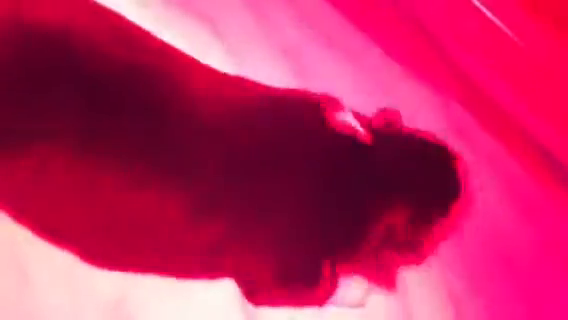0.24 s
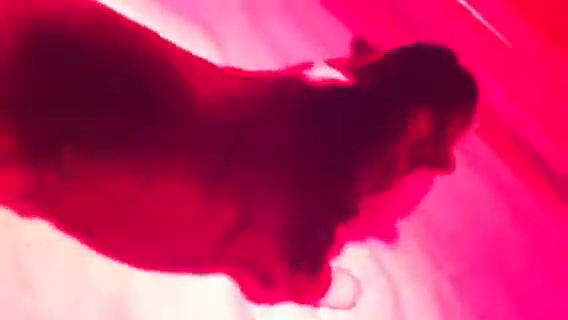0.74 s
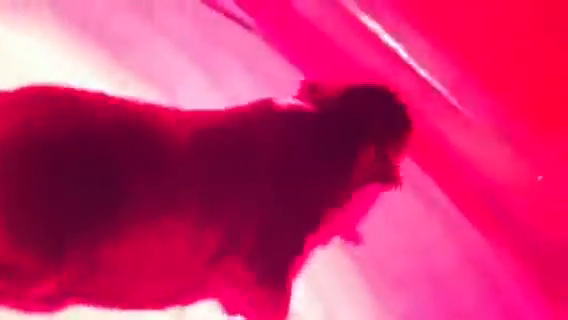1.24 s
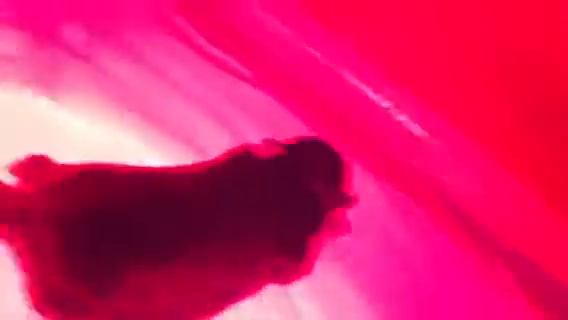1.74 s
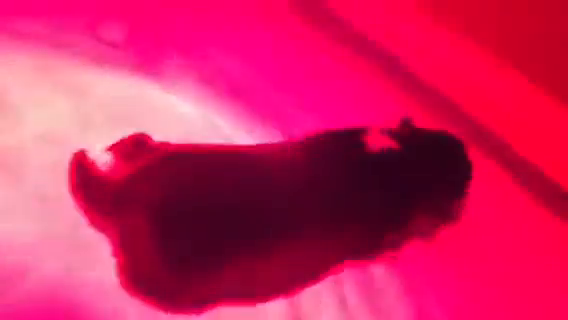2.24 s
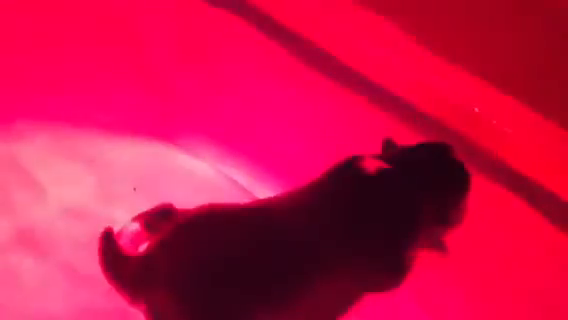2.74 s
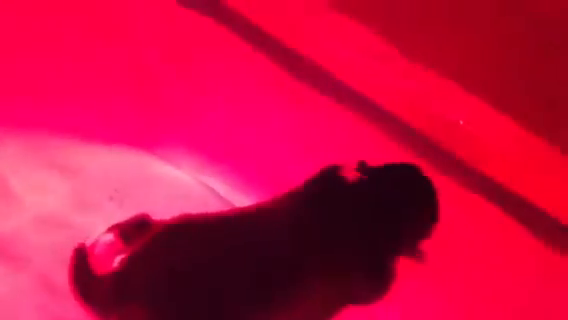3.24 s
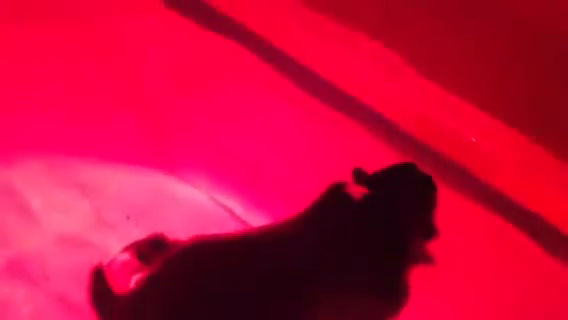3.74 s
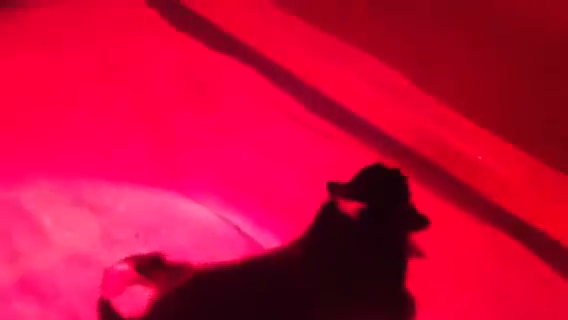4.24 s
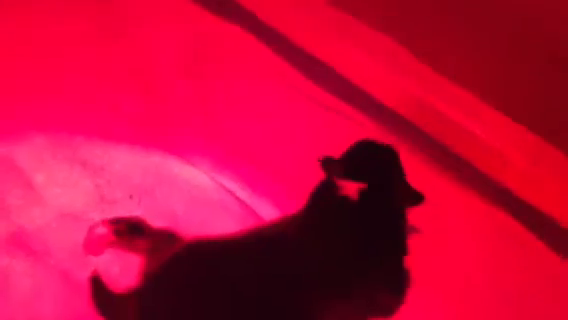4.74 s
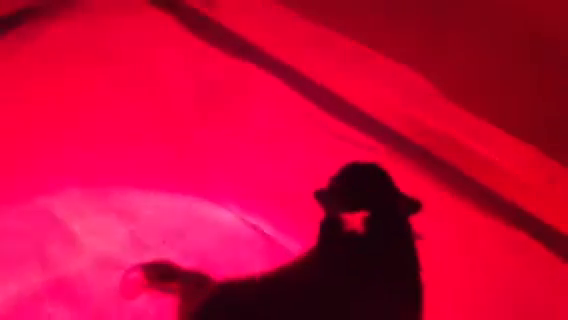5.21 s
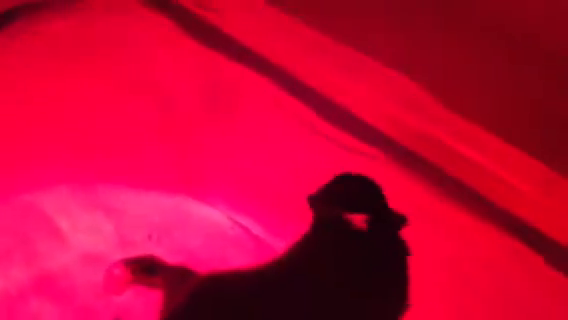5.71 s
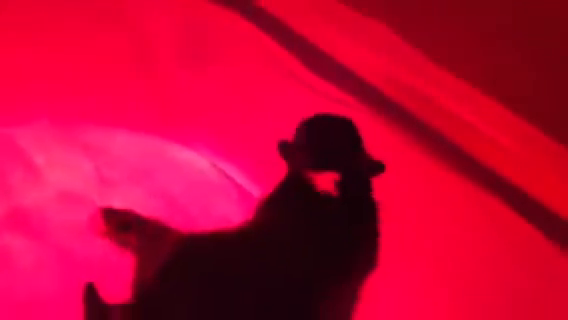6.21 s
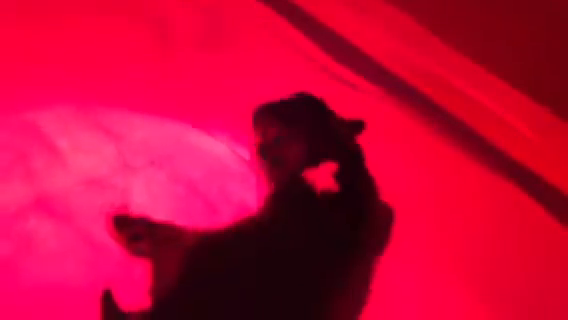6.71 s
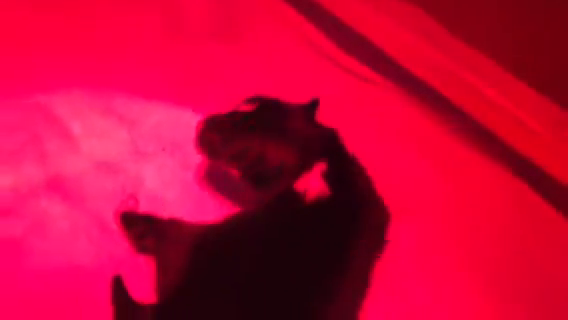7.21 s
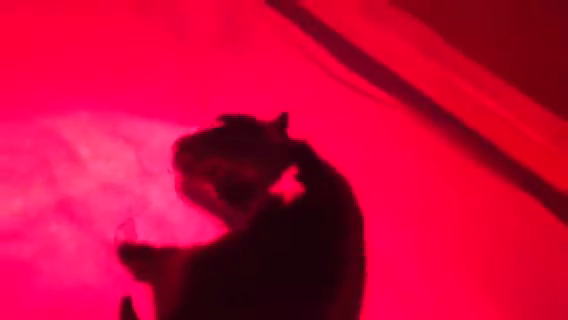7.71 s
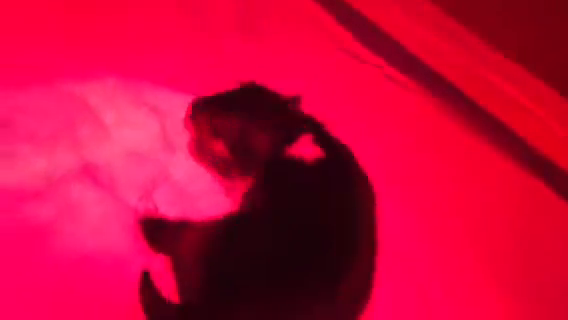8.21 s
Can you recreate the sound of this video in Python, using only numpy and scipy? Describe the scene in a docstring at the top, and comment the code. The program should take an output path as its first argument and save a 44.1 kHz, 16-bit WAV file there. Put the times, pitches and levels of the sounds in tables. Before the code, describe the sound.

A tiny puppy gives brief nasal whimpers and three sudden loud squeals among faint squeaks and wavering whines, over a soft hiss and hum.

```python
"""Newborn puppies call in a whelping box in a small, quiet room, close to the microphone.
One whimpers in short, low, nasal calls and three times breaks into a loud arching squeal; thin squeaks and
wavering whines come in between. Each voice is a harmonic stack on an unsteady pitch, shaped by throat resonances.
Filtered noise makes the nose air, and damped bursts make the ticks and soft bumps of crawling.
Box reflections and a brief tail answer; a low hum of sines and a steady hiss lie beneath."""
import sys
import numpy as np
from scipy import signal
from scipy.fft import rfft, irfft
from scipy.io import wavfile
from scipy.ndimage import uniform_filter1d

SR = 44100
rng = np.random.default_rng(int(sys.argv[2]) if len(sys.argv) > 2 else 0)


def store_wav(level_fs):
    """Save 16-bit WAV to argv[1]."""
    pcm = np.round(np.clip(np.atleast_2d(level_fs), -1, 1) * 32767)
    wavfile.write(sys.argv[1], SR, pcm.T.astype(np.int16))


N = 373086
TIME = np.arange(N) / SR  # s

# Resonances of the wide-open mouth. Each row: frequency in hertz, relative level in dB.
MOUTH = [(1300, 21.5), (3200, 4.5), (4100, 4), (4700, -6.5), (5400, -6), (5800, -7.5), (6600, -2.5),
         (7200, -12.5), (7700, -4), (8700, -19.5), (9600, -4.5), (10900, -11), (11500, -1), (12200, -24.5),
         (13000, -14), (15500, -30.5)]


def gain_of(db):
    """Level law: an amplitude ratio is ten to the power of decibels over twenty."""
    return 10 ** (np.asarray(db) / 20)


def evened(x):
    """Normalization of power: scales to rms 1."""
    return x / np.sqrt(np.mean(x ** 2) + 1e-20)


def read(points, hz):
    """Interpolation of a spectrum on a log-frequency axis, as the ear spaces pitch."""
    f, value = np.transpose(points)
    return np.interp(np.log(hz + 1), np.log(f), value)


def add(mix, s, sound):
    """Superposition: mixes a sound in at s seconds; what falls before time zero is dropped."""
    at = round(s * SR)
    sound = sound[max(-at, 0):]
    part = mix[max(at, 0):][:len(sound)]
    part += sound[:len(part)]


def noise(colour, size):
    """Spectral shaping: white noise weighted by the function colour(Hz), at rms 1."""
    spectrum = rfft(rng.standard_normal(size))
    hz = np.fft.rfftfreq(size, 1 / SR)
    return evened(irfft(spectrum * colour(hz), size))


def flutter(hz):
    """Low-passed noise: random wavering up to about hz times a second, long enough for any call."""
    return noise(lambda f: 1 / (1 + (f / hz) ** 4), size=32768)


def controls(curve):
    """Piecewise-linear control: time since the start, then each column with its corners rounded."""
    s, *columns = np.transpose(curve)
    t = np.arange(s[0], s[-1], 1 / SR)
    return [t - s[0]] + [uniform_filter1d(np.interp(t, s, c), size=130) for c in columns]


def puppies():
    """Superposed voices: clean low whimpers, strained squeals, wavering whines and thin squeaks."""
    # Low whimpers. Each row: start in seconds, length in seconds, base pitch in hertz; arch, glide and
    # quaver as shares of pitch; base levels of fundamental, second and joint higher harmonics in dB;
    # swell from start to end in dB, peak of the opening knock in dB, nasality in dB.
    whimpers = [ (-.06, 0.15, 416.3, -0.026, 0.024, 0.007, -52.5, -43, -58, 7.5, -58, 3),
                (0.254, 0.05, 375.7, -0.071, -0.071, 0, -52, -42.5, -55, -3, -46, 3),
                (0.525, .229, 435.4, .06, 0, 0.0099, -51.5, -41.5, -57.5, 3.5, -47, 8.5),
                (0.926, .094, 393, -0.052, -0.045, 0.0056, -55.5, -45, -59.5, 7, -52, 6),
                (2.534, .108, 348, -0.011, 0.058, 0.019, -56.5, -61, -58.5, 2, -70, -5),
                (4.069, 0.12, 352.2, 0.02, 0.093, 0.043, -53, -56, -55.5, 6.5, -66, 6),
                (5.407, .168, 398, 0.0363, 0.095, 0.011, -51.5, -43, -60.5, 11.5, -72, 2),
                (5.809, 0.21, 426.4, 0.085, .04, 0.038, -47.5, -44.5, -54, 6, -50, 0),
                (6.224, 0.061, 375, -0.042, 0.013, 0.0043, -47.5, -52.5, -55.5, -5.5, -46, -4),
                (6.478, .134, 432.4, 0.0726, 0.0048, 0.012, -46.5, -51.5, -55.5, 4, -50, 9),
                (6.817, 0.079, 426.5, .06, 0.045, 0, -45.5, -48.5, -57, 6, -50, 0.5),
                (7.816, 0.037, 399, -0.023, -.2, 0.013, -51, -58, -60.5, 3, -68, 12),
                (8.064, .036, 360, -0.047, -0.044, 0.0017, -50, -58.5, -65, 3.5, -72, 6),
                (8.3, .028, 383, -0.03, -0.0096, 0, -50, -62, -68, -3, -68, 15), ]
    # Cries that sweep in pitch, one curve each. Each row: time in seconds, pitch in hertz,
    # base levels of fundamental, second and joint higher harmonics in dB.
    squeals = [
        [(1.336, 1005, -54, -50, -78), (1.347, 825, -53, -61.5, -68), (1.38, 674, -58, -49.5, -57.5),
         (1.415, 467, -49.5, -54, -58), (1.435, 430, -53, -81, -85)],
        [(1.522, 552, -59.5, -56, -63), (1.55, 807, -44, -61.5, -74), (1.592, 1176, -41.5, -54, -75.5),
         (1.606, 1487, -53.5, -61.5, -80), (1.625, 1540, -45.5, -59, -71), (1.642, 1526, -51, -69.5, -76),
         (1.666, 998, -41.5, -50.5, -78), (1.692, 914, -44.5, -76, -78.5)],
        [(1.848, 1096, -47.5, -76, -81), (1.87, 1240, -43.5, -57, -82), (1.88, 1340, -53, -57.5, -75.5),
         (1.89, 1400, -45, -56.5, -49), (1.919, 1622, -34, -32.5, -40.5), (1.927, 1897, -22, -47, -33),
         (1.96, 1891, -24, -44, -47.5), (1.976, 2030, -30.5, -57, -60), (2.005, 1986, -56, -55.5, -59),
         (2.037, 1930, -51, -63, -58), (2.054, 1842, -32, -62, -53), (2.068, 1780, -34, -71, -56.5)],
        [(2.062, 1059, -39.5, -47, -60), (2.09, 851, -33, -46, -62), (2.12, 690.5, -41, -56, -68),
         (2.16, 558, -57, -42, -56), (2.2, 505.6, -52.5, -39.5, -58), (2.275, 483.3, -57, -50, -62.5),
         (2.298, 394, -56, -42, -62)],
        [(3.416, 1212, -43.5, -58, -76), (3.432, 1042, -43.5, -54, -55.5), (3.45, 1034, -43, -33.5, -44),
         (3.468, 1168, -32.5, -20, -40.5), (3.484, 1281, -41, -33, -36), (3.505, 1349, -30, -29, -33.5),
         (3.518, 1422, -40.5, -16, -46.5), (3.533, 1428, -31, -21.5, -50.5), (3.543, 1450, -43, -40, -56.5),
         (3.57, 1416, -31.5, -32, -51.5), (3.605, 1476, -38, -46.5, -63), (3.66, 1451, -36.5, -39, -54.5),
         (3.683, 1392, -24, -39, -51), (3.702, 1359, -31, -45.5, -56.5), (3.72, 1157, -27.5, -40.5, -55),
         (3.765, 795, -45, -43.5, -58.5), (3.82, 519.6, -61, -56, -51)],
        [(4.634, 958, -46.5, -65.5, -81), (4.645, 1007, -43, -58, -70), (4.654, 1048, -33.5, -50.5, -63),
         (4.681, 1172, -34.5, -31.5, -42.5), (4.728, 1375, -34, -35.5, -33.5), (4.757, 1310, -42, -26, -45.5),
         (4.777, 1150, -31, -42.5, -54), (4.793, 988, -39.5, -38, -49), (4.815, 891, -35.5, -43, -56),
         (4.835, 762, -38.5, -48.5, -52), (4.866, 661, -40.5, -56, -50.5), (4.88, 591, -53, -43, -57),
         (4.912, 598.5, -45, -47.5, -57.5), (4.968, 498, -44.5, -39.5, -57), (4.988, 439.3, -47.5, -41, -50),
         (5.06, 426.3, -48, -43.5, -62.5), (5.118, 405.6, -48.5, -44.5, -58), (5.134, 349, -51, -54, -55)],
    ]
    # A low grunt that closes the first loud squeal: same columns as the squeals.
    grunt = [(2.286, 208, -55, -67, -66), (2.302, 408, -50, -74, -60), (2.319, 180, -54.5, -51, -68)]
    # Long wavering whines, one curve each. Each row: time in seconds, pitch in hertz,
    # base levels of fundamental and second harmonic in dB.
    whines = [
        [(.085, 846, -51, -53), (.11, 857, -56, -57), (.168, 959, -51, -50), (.198, 892, -59, -58),
         (.218, 850, -56, -61)],
        [(7.41, 1304, -60, -66), (7.423, 1252, -50, -53.5), (7.465, 1460, -58.5, -70), (7.483, 1293, -50, -54),
         (7.505, 1307, -54, -55), (7.525, 1430, -55, -73), (7.555, 1360, -64, -59.5), (7.61, 1411, -63, -82),
         (7.64, 1326, -55, -64), (7.66, 1340, -51.5, -77)],
    ]
    # Thin squeaks. Each row: start in seconds, length in seconds, base pitch at the start, middle and end
    # in hertz, base levels of fundamental and second harmonic in dB.
    squeaks = [ (0.062, 0.026, 1040, 1140, 1100, -53, -67), (0.212, .038, 1090, 1060, 1030, -51, -65.5),
               (0.551, .05, 602, 555, 467, -58, -53.5), (2.522, 0.088, 1016, 1145, 1002, -54, -68),
               (2.813, 0.099, 1005, 888, 937, -56, -61), (3.099, .027, 1330, 1117, 750, -51.5, -84),
               (3.379, 0.015, 1137, 1168, 1122, -59, -87), (3.985, 0.029, 967, 945, 810, -61, -82),
               (4.019, 0.053, 588, 602, 577, -67.5, -54), (4.298, 0.036, 1230, 1243, 1370, -55, -87),
               (5.203, 0.06, 1804, 1670, 1580, -59.5, -88), (5.236, .062, 1390, 1278, 1247, -45.5, -64.5),
               (5.589, 0.055, 1713, 1797, 1892, -63, -89), (6.616, 0.082, 1538, 1560, 1645, -58.5, -77),
               (6.686, 0.04, 1740, 1846, 1900, -52, -89), (6.74, 0.0435, 1970, 2010, 2235, -48.5, -88), ]
    out = np.zeros(N)
    for start, *row in whimpers:
        add(out, start, whimper(*row))
    for curve in squeals + [grunt]:
        add(out, curve[0][0], squeal(curve))
    for curve in whines:
        add(out, curve[0][0], thin_voice(*controls(curve)))
    for start, *row in squeaks:
        add(out, start, squeak(*row))
    return out


def whimper(length, pitch_hz, arch, glide, quaver, first_db, second_db, upper_db, swell_db, pop_db, nasality_db):
    """Breath pressure moves pitch and level: a note catches sharp, then sags and darkens as the mouth shuts."""
    catch, catch_s = 0.2725, 0.0078  # share by which it starts sharp, time constant of settling
    sag, sag_s = 0.22, 0.0094  # share by which it ends flat as the push gives out, time constant
    quaver_hz = 12.0  # tremble of the pitch
    attack_db, attack_s, release_db, release_s = -8, 0.0088, -18.5, 0.0058  # fades at both ends
    closing_s, closing_db = 0.016, (6.5, -9, -1)  # change of fundamental, second, higher harmonics
    t = np.arange(0, length, 1 / SR)
    along, left = t / length - .5, length - t
    hz = pitch_hz * (1 - arch * (2 * along) ** 2 + glide * along + quaver * np.cos(2 * np.pi * quaver_hz * t))
    hz *= 1 + catch * np.exp(-t / catch_s)
    hz *= 1 - sag * np.exp(-left / sag_s)
    effort_db = attack_db * np.exp(-t / attack_s) + swell_db * along + release_db * np.exp(-left / release_s)
    closing = np.exp(-left / closing_s)
    base_levels_db = (first_db, second_db, upper_db)
    levels_db = [db + effort_db + shut_db * closing for db, shut_db in zip(base_levels_db, closing_db)]
    voice = call(t, hz, levels_db, nasality_db, jitter=0.0015, jitter_hz=121, shimmer=0.021,
                 rasp=0.0089, rasp_hz=204, strain=11.2, patchy_db=3.5)
    add(voice, .002, glottal_pop(pop_db, hz=740, decay=.0011))
    return voice


def glottal_pop(db, hz, decay):
    """Damped resonance: the folds burst open with one short knock on the throat."""
    t = np.arange(1024) / SR
    envelope = t / decay * np.exp(1 - t / decay)  # peaks at 1
    return gain_of(db) * np.sin(2 * np.pi * hz * t) * envelope


def squeal(curve):
    """Voicing plus turbulence: a strained cry, with air rasping through the mouth as it is forced open."""
    rasp_db, rising_rasp_db = -17, 5  # air against the higher harmonics; more of it while the pitch climbs
    t, hz, *levels_db = controls(curve)
    voice = call(t, hz, levels_db, nasality_db=7, jitter=.003, jitter_hz=110, shimmer=.1,
                 rasp=0.011, rasp_hz=374, strain=3.2, patchy_db=3.5)
    rising = np.clip(np.gradient(np.log(hz)) * SR / 4, 0, 1)
    wide_open = np.clip(hz / 1000 - .4, 0, 1)
    # the mouth's colour, weakened below 3500 Hz
    air = noise(lambda f: gain_of(read(MOUTH, f)) / (1 + (3500 / (f + 1)) ** 6), size=32768)[:len(t)]
    air_gain = gain_of(levels_db[2] + rasp_db + rising_rasp_db * rising)
    return voice + air * wide_open * air_gain


def squeak(length, start_hz, middle_hz, end_hz, first_db, second_db):
    """Frequency and amplitude modulation: the thin voice on one trembling bend of pitch."""
    edge_db, edge_s = -5.5, 0.008  # fade at both ends
    quaver, quaver_hz, throb_db = 0.0027, 14, 4.5  # rms share of pitch, rate, rms change of level
    t = np.arange(0, length, 1 / SR)
    bend = np.polyfit([0, .5, 1], [start_hz, middle_hz, end_hz], 2)
    hz = np.polyval(bend, t / length)
    hz *= 1 + quaver * flutter(quaver_hz)[:len(t)]
    edges = np.exp(-np.minimum(t, length - t) / edge_s)
    effort_db = edge_db * edges + throb_db * flutter(quaver_hz)[:len(t)]
    return thin_voice(t, hz, first_db + effort_db, second_db + effort_db)


def thin_voice(t, hz, first_db, second_db):
    """Steep spectral slope: a small, wavering whistle of a voice with little above its second harmonic."""
    levels_db = [first_db, second_db, second_db - 22]
    return call(t, hz, levels_db, nasality_db=0, jitter=.005, jitter_hz=90, shimmer=.1,
                rasp=.045, rasp_hz=150, strain=1.3, patchy_db=3)


def call(t, hz, levels_db, nasality_db, jitter, jitter_hz, shimmer, rasp, rasp_hz, strain, patchy_db):
    """Source and filter: vibrating folds give harmonics of an unsteady pitch; the throat shapes the upper ones."""
    first_db, second_db, upper_db = levels_db
    # the folds are least steady while the pitch slides fast
    slide = np.minimum(abs(np.gradient(np.log(hz))) * SR / 8, 1)
    unrest = 1 + strain * slide
    hz = hz * (1 + jitter * unrest * flutter(jitter_hz)[:len(t)])
    phase = 2 * np.pi * np.cumsum(hz) / SR
    k = np.arange(1, 17)[:, None]  # harmonic numbers
    # the high harmonics swell and fade each on its own
    patches = np.array([flutter(35)[:len(t)] for _ in k[2:]])
    upper_hz = k[2:] * hz
    upper = gain_of(throat_db(upper_hz, hz, nasality_db) + patchy_db * patches)
    upper *= upper_hz < SR / 2
    # their joint power is set to upper_db
    upper *= gain_of(upper_db) / np.sqrt((upper ** 2).sum(0))
    heights = np.vstack([gain_of(first_db), gain_of(second_db), upper])
    # uneven cycles put a skirt of noise round each harmonic, stronger on the high ones
    skirts = np.array([flutter(rasp_hz)[:len(t)] + 1j * flutter(rasp_hz)[:len(t)] for _ in k])
    spread = np.minimum(rasp * k * unrest, .7)
    rough = (1 + spread * skirts) / np.sqrt(1 + 2 * spread ** 2)
    lag = 2 * np.pi * rng.random(k.shape)  # the throat delays each harmonic differently
    stack = heights * np.exp(1j * (k * phase + lag)) * rough
    gate = np.clip(np.minimum(t - t[0], t[-1] - t) / .004, 0, 1)  # 4 ms ramps at both ends
    return np.sqrt(2) * stack.real.sum(0) * gate * (1 + shimmer * flutter(jitter_hz)[:len(t)])


def throat_db(hz, pitch_hz, nasality_db):
    """Resonance and antiresonance: the mouth opens as pitch climbs; nasality notches the middle, dulls the top."""
    # Resonances with the mouth nearly shut. Each row: frequency in hertz, relative level in dB.
    nose = [(900, 15), (1250, 3), (1450, -9), (1750, -5.5), (1900, -12), (2150, -7.5), (2350, -18),
            (2600, -15.5), (3000, -22), (3500, -30), (6000, -44)]
    notch_hz, notch_width_hz = 1310, 150
    opening = np.clip(np.log(pitch_hz / 440) / 0.91, 0, 1)
    notch = np.exp(-((hz - notch_hz) / notch_width_hz) ** 2)
    muffle = 0.98 * np.clip((hz - 2200) / 400, 0, 1)
    shut_db = read(nose, hz) - nasality_db * muffle
    return (1 - opening) * shut_db + opening * read(MOUTH, hz) - nasality_db * notch


def nose_air():
    """Turbulent flow: air through the narrow nose makes a faint, sputtering high hiss on the longer calls."""
    # Stretches of hiss. Each row: start in seconds, length in seconds, mid-way level in dB before a 6.5 dB cut.
    breaths = [(1.335, 0.1, -69), (1.553, .135, -66.5), (2.05, 0.043, -49), (2.09, 0.21, -59.5),
               (2.815, 0.14, -70), (3.68, 0.16, -58.5), (4.771, .35, -60), (5.829, .18, -65.5),
               (6.485, 0.21, -67.5), (7.41, 0.25, -67)]
    # Colour of the hiss. Each row: frequency in hertz, relative level in dB.
    air_colour = [(2500, -15), (4000, -8.5), (6000, -9.5), (6900, -13), (7800, 0.5), (9200, -14.5),
                  (10600, -8), (11700, -1.5), (13300, 1), (14500, -7), (16000, -17.5)]
    fade_db = -6  # from the start of each stretch to its end
    level = np.zeros(N)
    for start, length, db in breaths:
        ramp = np.linspace(-.5, .5, round(length * SR))
        add(level, start, gain_of(db + fade_db * ramp))
    level = uniform_filter1d(level, size=1000)
    sputter_db = 2.0 * noise(lambda f: 1 / (1 + (f / 70) ** 2), size=N)
    hiss = noise(lambda f: gain_of(read(air_colour, f)), size=N)
    return gain_of(sputter_db - 6.5) * level * hiss


def crawling():
    """Impact excitation: ticks are bright cracks with a short fizz; bumps are dull, quickly damped puffs."""
    # Sharp little ticks. Each row: time in seconds, peak in dB.
    ticks = [(0.3427, -44), (0.3702, -55), (0.4235, -62), (0.4473, -34), (0.4484, -40), (0.451, -39),
             (0.4526, -38), (0.4545, -51)]
    # Soft bumps and smacks of crawling and nuzzling. Each row: start in seconds, peak in dB,
    # centre frequency in hertz, decay constant in seconds.
    bumps = [(0.46, -56, 224, 0.0022), (0.49, -59, 198, 0.0027), (0.52, -56, 229, 0.0049),
             (1.335, -48, 1215, 0.0025), (1.421, -57, 235, 0.027), (2.08, -60, 200, 0.014),
             (2.486, -52.5, 1200, 0.0016), (2.813, -47.5, 1210, 0.0035), (4.63, -41, 1180, .003),
             (5.398, -46, 844, 0.0046), (2.776, -59, 1210, 0.0032), (3.031, -60, 255, 0.0044),
             (3.966, -56, 1280, 0.0021), (4.012, -49, 1336, 0.0047), (4.268, -55, 1300, 0.0033),
             (8.366, -49.5, 1000, 0.0046)]
    out, t = np.zeros(N), np.arange(4096) / SR
    bright = signal.butter(2, [4500, 13000], "bandpass", fs=SR, output="sos")
    for s, db in ticks:
        fizz = 0.086 * rng.standard_normal(len(t)) * np.exp(-t / .003)
        crack = signal.sosfilt(bright, signal.unit_impulse(len(t)) + fizz)
        add(out, s, gain_of(db) * crack / abs(crack).max())
    for s, db, hz, decay in bumps:
        body = noise(lambda f: 1 / (1 + (2.0 * (f / hz - hz / (f + 1))) ** 2), size=len(t))
        puff = body * t * np.exp(-t / decay)
        add(out, s, gain_of(db) * puff / abs(puff).max())
    return out


def room(x, tail_db):
    """Reverberation: single reflections off the box, and a diffuse tail that dies fastest in the high treble."""
    # Reverberation time. Each row: frequency in hertz, time to fall 60 dB in seconds.
    room_t60 = [(200, 0.48), (800, 0.32), (2000, 0.44), (5000, 0.27), (14000, 0.073)]
    # Colour of the tail. Each row: frequency in hertz, relative level in dB.
    room_colour = [(200, 1), (1200, 2), (2500, -1), (5000, 8.5), (14000, 1.5)]
    # Reflections off the box walls. Each row: delay in seconds, level against the direct sound in dB.
    reflections = [(.0017, -28), (.0041, -38), (.0068, -21), (0.0102, -27), (0.0156, -21)]
    taps = rng.standard_normal(SR) * (rng.random(SR) < .1)  # sparse random echoes
    hz, t, z = signal.stft(taps, SR, nperseg=256)
    fade = gain_of(-60 * t / read(room_t60, hz)[:, None])
    colour = gain_of(read(room_colour, hz))[:, None]
    tail = signal.istft(z * fade * colour, SR, nperseg=256)[1]
    tail *= np.clip(np.arange(len(tail)) / SR / 0.01161, 0, 1)  # builds up over 11.61 ms
    response = gain_of(tail_db) * tail / np.linalg.norm(tail)
    for delay, db in reflections:
        add(response, delay, gain_of([db]))
    return signal.fftconvolve(x, response)[:N]


def background():
    """Stationary noise and tones: a steady hiss and the low, slightly wavering hum of an appliance."""
    # Spectral density of the hiss. Each row: frequency in hertz, relative level in dB per hertz.
    floor = [(30, -22.5), (55, -18), (100, -5.5), (150, 0), (250, -3), (400, -2), (630, -4.5), (1000, -8),
             (2000, -10), (4000, -12), (8000, -14.5), (15800, -18)]
    # Partials of the hum. Each row: frequency in hertz, rms level at time zero in dB.
    partials = [(75.4, -80.5), (150.7, -79.5), (183, -91.5)]
    floor_db, hum_fade_db_per_s = -67.5, 0.46  # rms of the hiss; the hum slowly weakens
    hiss = noise(lambda f: gain_of(read(floor, f)), size=N) * gain_of(floor_db)
    drift = 0.00055 * noise(lambda f: 1 / (1 + (f / 3) ** 4), size=N)  # s, wavers the phase
    hum = np.zeros(N)
    for hz, db in partials:
        hum += gain_of(db) * np.sqrt(2) * np.sin(2 * np.pi * (hz * (TIME + drift) + rng.random()))
    return hiss + hum * gain_of(-hum_fade_db_per_s * TIME)


def scene():
    """Superposition of the litter, its room and the background, in mono."""
    litter = gain_of(0.53) * puppies() + nose_air() + crawling()
    return (litter + room(litter, tail_db=-11.5) + background())[None]


def record(dry):
    """Low-pass filtering: the recorder's band limit at 15800 Hz."""
    band_limit = signal.firwin(511, 15800, window=("kaiser", 9), fs=SR)
    return signal.oaconvolve(dry, band_limit[None], "same")


dry = scene()
out = record(dry)
store_wav(out)
```